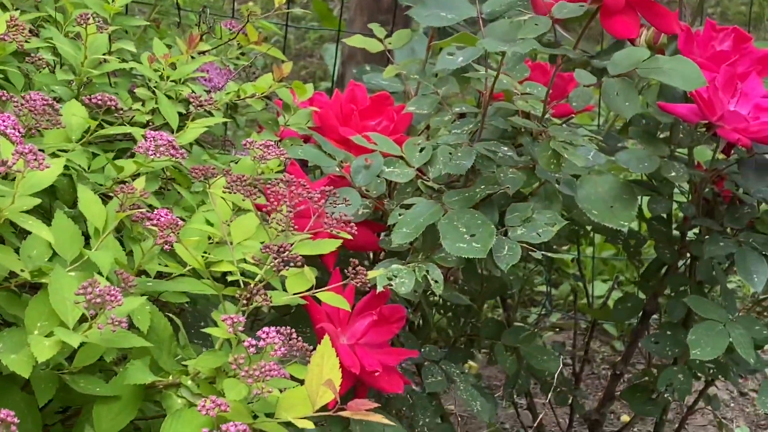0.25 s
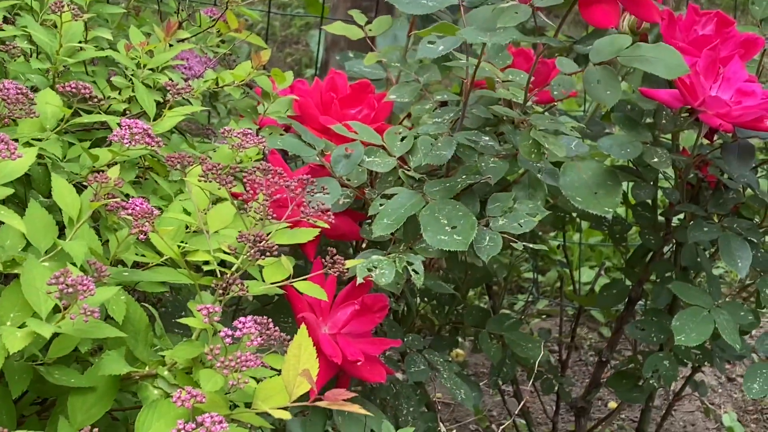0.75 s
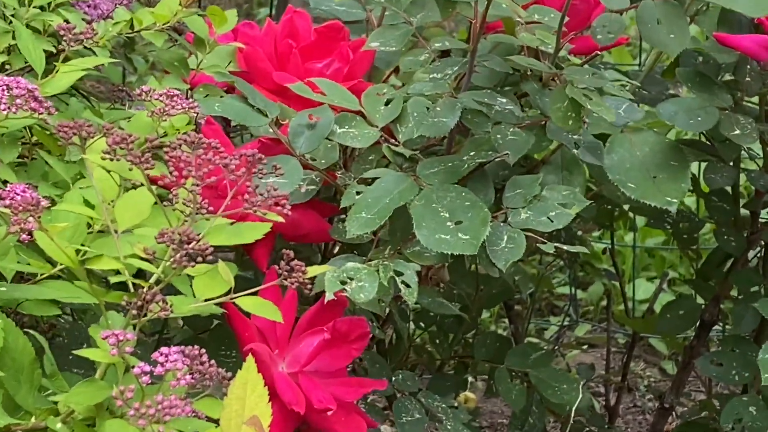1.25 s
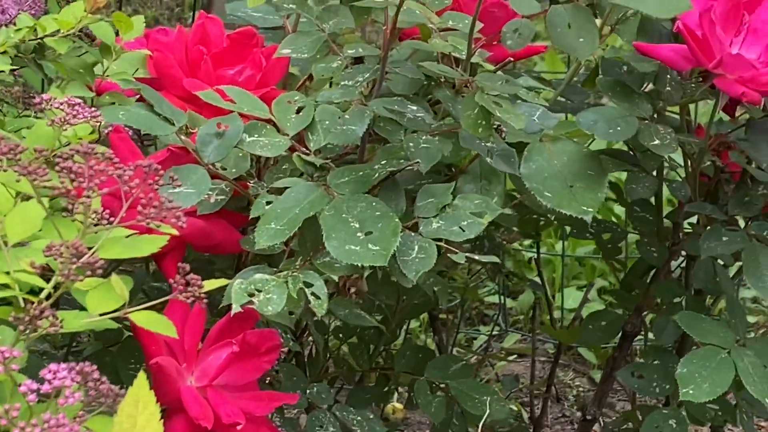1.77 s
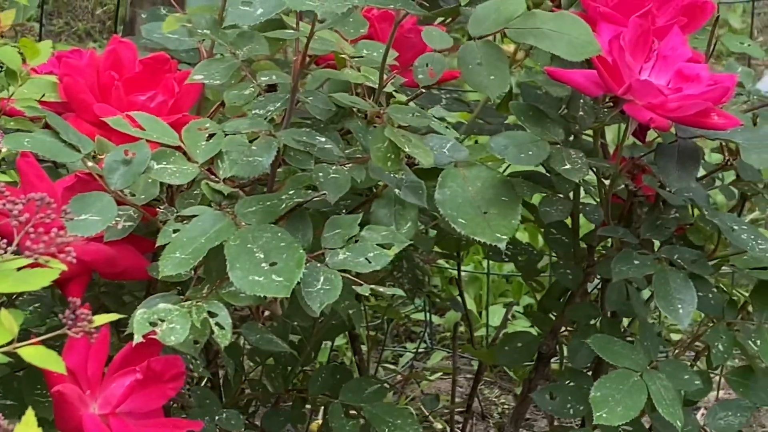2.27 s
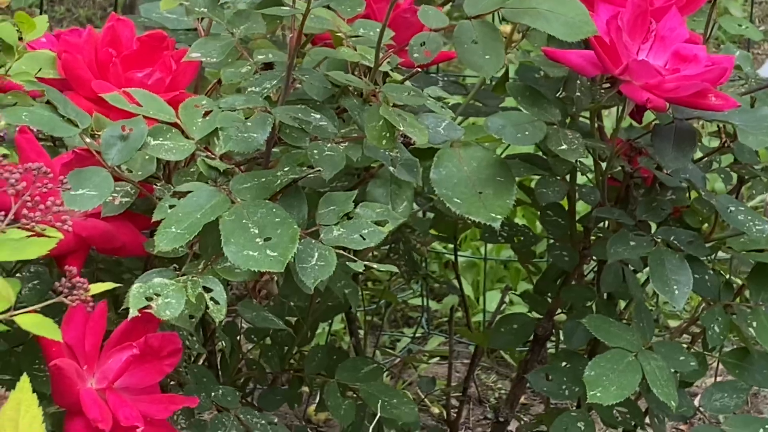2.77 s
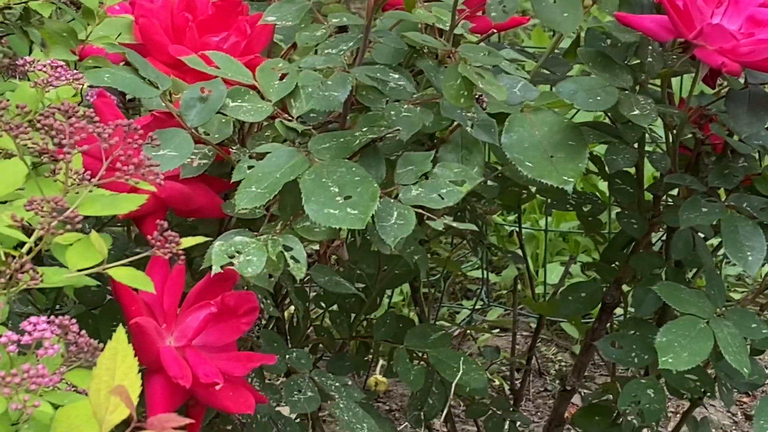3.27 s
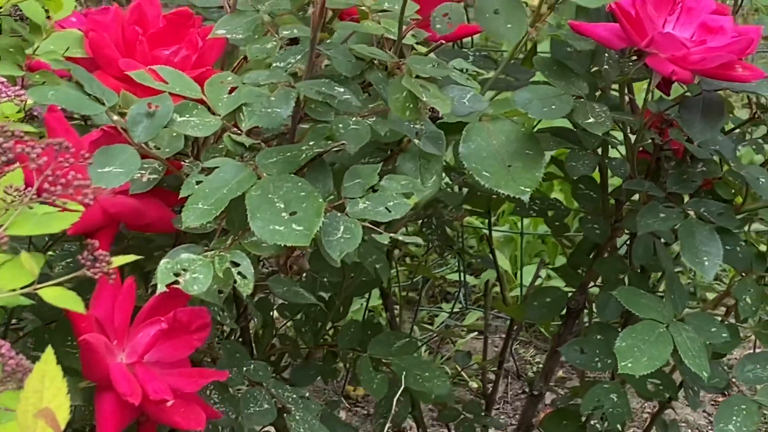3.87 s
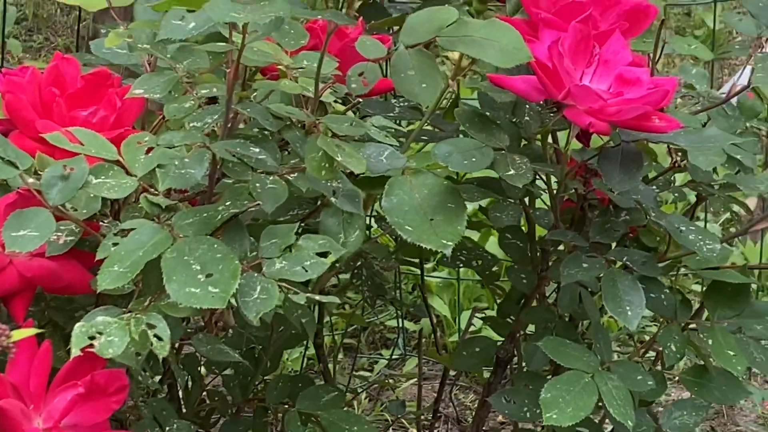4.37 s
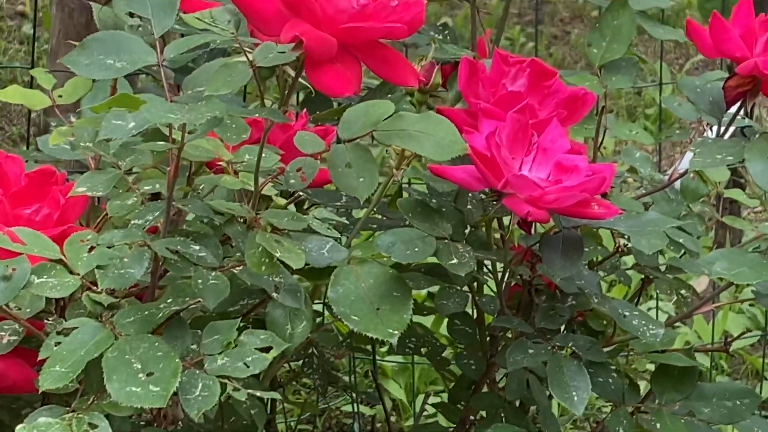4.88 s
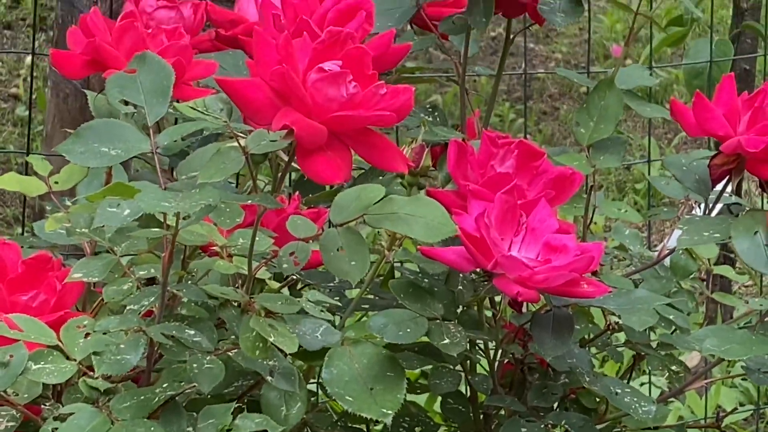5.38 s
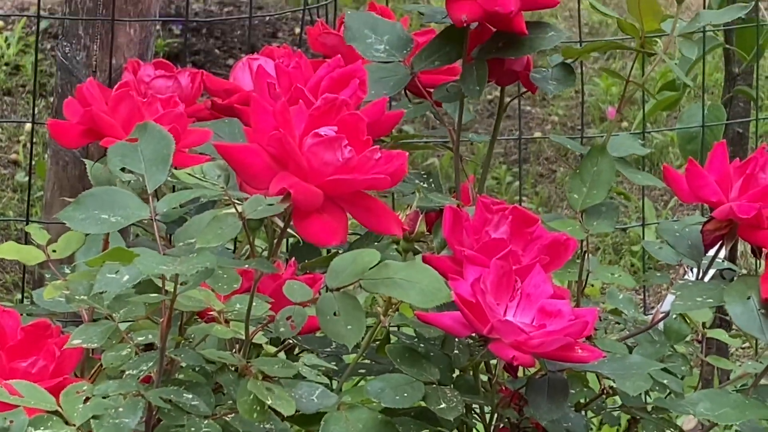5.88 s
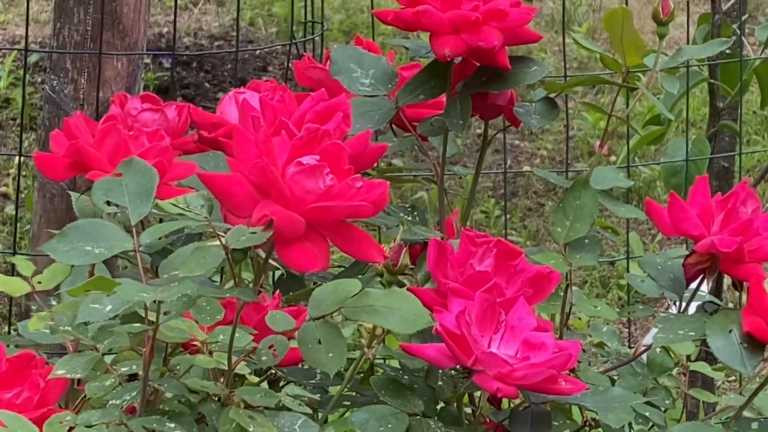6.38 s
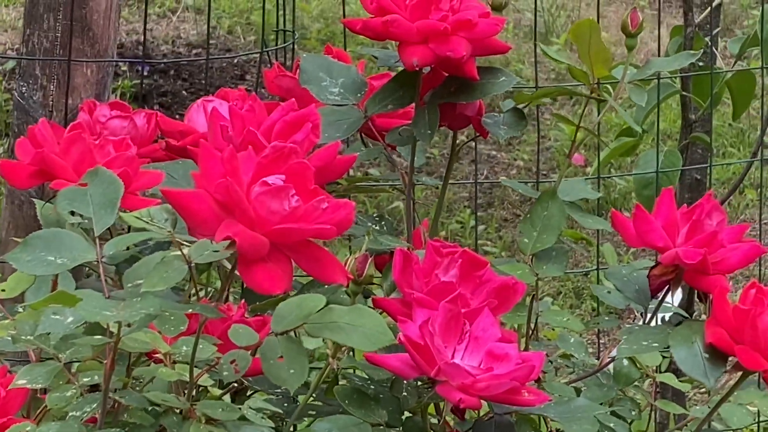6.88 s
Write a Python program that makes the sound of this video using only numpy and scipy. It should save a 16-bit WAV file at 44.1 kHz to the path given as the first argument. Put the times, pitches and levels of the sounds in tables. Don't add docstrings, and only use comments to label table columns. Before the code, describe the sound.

Faint diesel throb and rustling leaves, then gritty starter gears cranking, a booming engine rev, and a low uneven rumble with small metallic ticks.

```python
import sys
import numpy as np
from scipy import signal
from scipy.fft import rfft, irfft, next_fast_len
from scipy.io import wavfile
from scipy.ndimage import uniform_filter1d

SR = 44100
rng = np.random.default_rng(int(sys.argv[2]) if len(sys.argv) > 2 else 0)


def output_pcm(signal):
    pcm = np.clip(np.atleast_2d(signal).T, -1, 1) * 32767
    wavfile.write(sys.argv[1], SR, np.round(pcm).astype(np.int16))


def makeup_ratio(level_db):
    decades = np.asarray(level_db, float) / 20
    return 10 ** decades


N = 314874
TIME, PADDED = np.arange(N) / SR, next_fast_len(N + SR)
BIN_HZ = np.maximum(np.fft.rfftfreq(PADDED, 1 / SR), 1)


def rms_one(x):
    return x / np.sqrt(np.mean(x ** 2) + 1e-20)


def in_time(rows):
    s, *columns = np.transpose(rows)
    gate = np.interp(TIME, [s[0] - 0.03, s[0], s[-1], s[-1] + 0.03], [0, 1, 1, 0])
    return [gate] + [np.interp(TIME, s, c) for c in columns]


def at_hz(points):
    hz, value_db = np.transpose(points)
    octaves_outside = np.log2(np.maximum(hz[0] / BIN_HZ, 1) * np.maximum(BIN_HZ / hz[-1], 1))
    return np.interp(np.log(BIN_HZ), np.log(hz), value_db) - 24 * octaves_outside


def noise(gain):
    return rms_one(irfft(rfft(rng.standard_normal(PADDED)) * gain, PADDED)[:N])


def drift(hz):
    return noise(1 / (1 + (BIN_HZ / hz) ** 2))


def hump(s, length_s):
    return np.exp(-8 * ((TIME - s) / length_s) ** 2)


def age_s(start_s):
    return np.maximum(TIME - start_s, 0)


def attack(age, rise_s):
    return 1 - np.exp(-age / rise_s)


def sine(turns):
    return np.sin(2 * np.pi * turns)


def panel_gain(panels, share):
    bumps = [db / (1 + (2 * (BIN_HZ - hz) / width_hz) ** 2) for hz, width_hz, db in panels]
    return makeup_ratio(share * sum(bumps))


def resonate(x, modes):
    out = 0
    for k, (hz, width_hz, db) in enumerate(modes):
        r = np.exp(-np.pi * width_hz / SR)
        poles = [1, -2 * r * np.cos(2 * np.pi * hz / SR), r * r]
        out = out + (-1) ** k * makeup_ratio(db) * signal.lfilter([1 - r, 0, r - 1], poles, x)
    return out


def evened(x, span_s):
    return x / np.sqrt(uniform_filter1d(x ** 2, int(span_s * SR)) + 1e-12)


# start_s, level_db, throb_db
FAR = [
    (0.0, -45, 4),
    (0.14, -56, 1),
    (0.55, -55.5, 1.5),
    (0.8, -57, -2),
    (1.1, -58.5, 0.5),
    (1.4, -57, 4),
    (1.84, -54.5, -1.5),
]
# pitch_hz, level_db
FAR_LINES = [(52, -12), (78, -3), (102.5, 0), (129, -9), (156, -10), (180, -17), (205, -14), (231, -24)]


def far_diesel():
    throb_s, throb_peak_s = 0.1433, 0.548
    lines = sum(makeup_ratio(db + 2.6 * drift(4)) * np.sin(2 * np.pi * hz * TIME + hz) for hz, db in FAR_LINES)
    rumble = noise(1 / (1 + ((BIN_HZ - 80) / 55) ** 4))
    hum = rms_one(lines) + makeup_ratio(-10.5) * rumble
    _, level_db, throb_db = in_time(FAR)
    throb = np.cos(2 * np.pi * (TIME - throb_peak_s) / throb_s)
    return makeup_ratio(level_db + 10 + throb_db * throb) * hum


# freq_hz, density_db_per_hz
GARDEN = [(159, -11), (250, -10), (500, -18), (900, -21), (2200, -23.5), (2700, -29), (4000, -33.5),
          (6000, -38), (8000, -49), (10000, -53), (14000, -61), (15200, -68)]


def garden_air():
    breeze = makeup_ratio(0.6 * drift(4))
    return makeup_ratio(-58.5) * breeze * noise(makeup_ratio(at_hz(GARDEN)))


# centre_s, level_db, length_s, centre_hz, width_octaves
PUFFS = [(0.505, -50, 0.054, 250, 0.76), (0.54, -47.5, 0.032, 300, 0.8), (0.615, -59, 0.08, 8950, 11),
         (0.69, -44, 0.032, 129, 0.84), (1.16, -41, 0.074, 55, 0.42), (0.212, -72, .04, 5000, .2),
         (.405, -72, .04, 4600, .2), (0.78, -69, 0.055, 4800, .2), (0.793, -57, 0.17, 207, 0.08),
         (3.337, -55, 0.045, 4130, .2), (4.1, -60, 0.056, 3100, 0.53), (7.045, -48, 0.05, 1000, 1.3),
         (1.488, -39, 0.063, 275.4, 0.1), (1.49, -40, 0.055, 1692, 0.025), (1.286, -31, 0.067, 1620, 0.046),
         (3.323, -51, 0.039, 5000, 2.4), (4.378, -63, 0.079, 6750, 0.22), (4.42, -63, 0.061, 7200, 0.17),
         (4.568, -54, 0.037, 2200, 1.6), (5.106, -59, 0.058, 6800, .25), (5.67, -58, 0.045, 7000, 0.58),
         (7.01, -54.5, 0.079, 2310, 3.1)]
# centre_s, level_db, length_s, centre_hz, width_octaves
KNOCKS = [
    (0.608, -62.5, 0.1, 1700, 0.34),
    (0.93, -61.5, 0.45, 203, 0.18),
    (2.8, -53, .1, 372.6, 0.11),
    (4.3, -64, 0.037, 3500, 0.18),
    (7.03, -38.5, 0.036, 300, 0.38),
    (5.5, -71, 0.036, 3888, 0.41),
    (6.53, -58, 0.047, 2700, 0.29),
]
# centre_s, level_db, length_s, centre_hz, width_octaves
CLUNKS = [(2.0, -38, 0.026, 940, 0.12), (1.8, -38, .035, 1400, .2), (2.4, -40, .04, 1700, 0.13),
          (1.278, -30.5, 0.019, 1020, 0.11), (.584, -62, .015, 7500, 4.4), (0.674, -75, .06, 5700, 3.0),
          (7.9, -30, 0.011, 180, 1), (7.022, -46, .03, 1500, 0.67), (7.046, -43, 0.019, 770, 0.26),
          (7.04, -44, 0.071, 454, 0.14), (2.5, -38, 0.042, 900, 1.8), (1.272, -29, 0.032, 3800, .4),
          (1.268, -35, .03, 5500, .15), (2, -38.5, 0.052, 1150, 0.049), (3.36, -52, .16, 930, 1.5),
          (3.355, -36, 0.069, 350, 0.13), (2.9, -35.5, 0.051, 1500, 1.15)]


def puffs():
    out = 0
    for s, db, length_s, hz, octaves in PUFFS + KNOCKS + CLUNKS:
        band = noise(np.exp(-2 * (np.log2(BIN_HZ / hz) / octaves) ** 2))
        shape = hump(s, length_s) + 1e-12
        burst = shape * band
        out = out + makeup_ratio(db) * burst * np.sqrt(np.sum(shape ** 2) / np.sum(burst ** 2))
    return out


# centre_s, length_s, pitch_hz, glide_hz_per_s, level_db
BOOMS = [(.535, 0.084, 78.5, -2, -37.5), (1.171, 0.16, 77, 0, -43), (1.376, 0.22, 54, -20, -41),
         (1.701, 0.13, 80.5, 0, -42), (1.716, 0.15, 56.5, 0, -38), (1.901, 0.16, 71.4, 63, -29),
         (2.324, 0.11, 64, 0, -21.5), (2.455, .11, 61.4, 0, -26), (2.591, 0.19, 63, 0, -26),
         (2.728, .14, 59.5, -2, -22.5), (2.899, 0.21, 67, 40, -24.5), (2.993, 0.082, 86, 0, -31),
         (3.1, 0.2, 74.5, 0, -27), (3.239, .16, 79, -2, -23.5), (3.339, .1, 75.5, -20, -29),
         (3.2, .12, 166.5, -30, -35), (3.23, 0.089, 123, 0, -29)]


def booms():
    out = 0
    for s, length_s, hz, glide, db in BOOMS:
        since = TIME - s
        out = out + makeup_ratio(db + 2 * drift(35)) * hump(s, length_s) * sine((hz + glide / 2 * since) * since)
    return out


# start_s, pitch_hz, level_db
PUMP = [
    (0.56, 348.1, -61),
    (0.582, 351, -74),
    (0.654, 356.9, -63),
    (0.988, 350.2, -67.5),
    (1.212, 344, -68),
    (1.232, 343, -72),
    (1.27, 334, -52),
]


def fuel_pump():
    gate, pitch_hz, level_db = in_time(PUMP)
    return gate * makeup_ratio(level_db + 6.5) * sine(np.cumsum(pitch_hz) / SR)


# start_s, peak_db, ring_hz, ring_db, t60_s
JOLTS = [
    (1.256, -29, 323, -44, 0.62),
    (1.284, -26, 289, -34.5, 0.13),
    (1.599, -22.5, 310, -27.5, 0.26),
    (1.693, -24, 340, -30.5, 0.28),
    (1.774, -19.5, 370, -35, 0.15),
    (1.797, -33, 282, -47, 0.39),
    (1.995, -32, 300, -41, 0.13),
]
# freq_hz, density_db_per_hz
GEARS = [(250, -1.5), (450, -4), (750, -8), (1000, -9), (1700, -2), (2200, -6), (3000, -6.5), (4000, -15)]
# freq_hz, width_hz, gain_db
PANELS = [(528, 20, -10), (700, 7, 5), (1000, 160, 8.5), (1166, 32, 13.5), (1345, 60, 7), (1460, 12, 9),
          (1650, 12, 8), (1680, 29, 11), (1770, 40, 9), (1910, 45, 11), (2430, 9.1, 15.5), (3650, 20, -2),
          (4030, 45, -7), (4450, 30, 15), (4680, 40, 10), (5450, 31, 11), (5700, 51, 5), (5960, 370, 0)]


def gear_grind(grind_db):
    level = makeup_ratio(grind_db)
    for s, peak_db, _, _, t60_s in JOLTS:
        age = age_s(s)
        level = level + makeup_ratio(peak_db - 10.5) * attack(age, 0.0055) * makeup_ratio(-60 * age / t60_s)
    grit = makeup_ratio(0.77 * drift(240))
    return level * grit * noise(makeup_ratio(at_hz(GEARS)) * panel_gain(PANELS, share=0.99))


# centre_s, length_s, mesh_hz, level_db
SINGS = [
    (1.388, 0.08, 236.2, -35.5),
    (1.495, 0.029, 275.8, -47),
    (1.527, 0.042, 246.8, -39),
    (1.711, .03, 362, -38.5),
    (1.793, 0.033, 375, -37.5),
]
MESH = [4, 13.5, 14, 3.5, -7, 6, -15, 11.5]


def gear_song():
    sag_hz_per_s = 40
    swells = np.array([makeup_ratio(db) * hump(s, 2 * length_s) for s, length_s, _, db in SINGS]) + 1e-12
    centre_s, _, mesh_hz, _ = np.transpose(SINGS)[:, swells.argmax(axis=0)]
    pitch_hz = mesh_hz - sag_hz_per_s * np.clip(TIME - centre_s, -0.1, 0.1)
    turns = np.cumsum(pitch_hz * (1 + 0.0087 * drift(41))) / SR
    tone = sum(makeup_ratio(db + 2 * drift(20)) * sine((k + 1) * turns) for k, db in enumerate(MESH))
    return swells.max(axis=0) * rms_one(tone)


# pitch_hz, level_db, t60_s
HOUSING = [(702, -2, 0.11), (971, 7, 0.044), (1160, -20, 0.12), (1298, -9, 0.13), (1570, -13, 0.22),
           (1690, -18, 0.14), (1960, -24, 0.098), (2520, -23, .12)]


def housing_ring():
    strike_spread_db = 2
    ring = 0
    for s, peak_db, ring_hz, ring_db, _ in JOLTS:
        age = age_s(s)
        swing = attack(age, 0.0011) * makeup_ratio(-60 * age / 0.2) * (1 + 0.5 * sine(64 * age))
        ring = ring + makeup_ratio(ring_db - 0.5) * swing * sine(ring_hz * age)
        for hz, db, t60_s in HOUSING:
            luck_db = strike_spread_db * rng.standard_normal()
            strength = makeup_ratio(peak_db + db - 6.5 + luck_db - 60 * age / t60_s)
            ring = ring + attack(age, 0.011) * strength * sine(hz * age)
    return ring


# start_s, grind_db, rasp_centre_hz
STARTER = [(1.243, -65, 4230), (1.26, -35, 4230), (1.33, -41.5, 4380), (1.5, -36.5, 4560),
           (1.545, -38.5, 4600), (1.565, -41.5, 4630), (1.67, -46.5, 5200), (1.74, -45, 5620),
           (1.85, -49.5, 5800), (2.02, -37.5, 5870), (2.07, -56, 5450)]


def starter():
    gate, grind_db, _ = in_time(STARTER)
    return gate * (gear_grind(grind_db) + gear_song() + housing_ring())


# start_s, level_db, t60_s
SCRAPES = [
    (1.245, -45, 0.12),
    (1.258, -25, 0.1),
    (1.28, -34, 0.062),
    (1.598, -43, 0.13),
    (1.693, -41, 0.18),
    (1.77, -39, 0.26),
    (1.885, -46, 1),
    (1.982, -36, 0.15),
]
# freq_hz, density_db_per_hz
RASP_COLOUR = [(2500, -8), (3500, -4.5), (5000, -6.5), (5700, -4.5), (8000, -4.5), (10000, -12),
               (14000, -17), (15600, -13)]


def rasp():
    gate, _, centre_hz = in_time(STARTER)
    running = np.interp(TIME, [1.25, 1.262, 2.01, 2.04], [0, 1, 1, 0])
    level = running * makeup_ratio(-46 + 4 * (TIME - 1.42))
    for s, db, t60_s in SCRAPES:
        age = age_s(s)
        level = level + attack(age, 0.0039) * makeup_ratio(db - 60 * age / t60_s)
    wide = noise(makeup_ratio(at_hz(RASP_COLOUR)) * panel_gain(PANELS, share=0.67))
    carrier = np.sqrt(2) * sine(np.cumsum(centre_hz) / SR)
    narrow = noise(1 / (1 + (BIN_HZ / 450) ** 4)) * carrier
    return gate * level * (wide + makeup_ratio(-7) * narrow)


CYLINDERS = [0.5, -2, 0.5, 1, -6, -0.5, -1.5, -1.5]


def firings(turns, spread_db, jitter, cancelled):
    count = np.arange(int(turns[-1]))
    late, strong = rng.standard_normal((2, len(count)))
    at = np.interp(count + jitter * late, turns, np.arange(N)).astype(int)
    clicks = np.full(N, 1e-18)
    np.add.at(clicks, at, makeup_ratio(np.array(CYLINDERS)[count % 8] + spread_db * strong) - cancelled)
    return clicks


# freq_hz, width_hz, gain_db
PIPE = [(45.7, 25.6, -6), (63.4, 9.1, -4.5), (80, 18, -7.5), (105.5, 33.4, -5), (136.4, 4.7, 1)]


def pipe_thud(turns):
    clicks = firings(turns, spread_db=2, jitter=0.04, cancelled=0.95)
    return 0.85 * evened(resonate(clicks, PIPE), 0.3)


# multiple_of_firing_rate, level_db_re_thud, resonance_hz, width_hz
BELT = [(2.08, 2, 128, 30), (.875, -6, 55, 30), (1.18, -1.5, 74, 22), (.625, -6, 45, 40),
        (1.375, -9, 88, 30), (.75, -4, 78, 14), (1.875, -6, 110, 16), (1.75, 1, 190, 55),
        (.875, -6, 100, 25), (1.5, -4, 165, 26), (1.375, -5, 150, 24), (1.25, -4, 125, 22),
        (3.375, -12, 213, 30), (4.5, -12, 288, 16), (3.875, -15, 245, 30), (3, -12, 190, 40),
        (2, -1, 114, 12), (2.625, -8, 298, 16), (2.75, -4, 305, 14)]


def driven_parts(turns, per_s):
    out = 0
    for multiple, db, hz, width_hz in BELT:
        near = 1 / (1 + (2 * (multiple * per_s - hz) / width_hz) ** 2)
        out = out + near * makeup_ratio(db + 1.5 + 1.7 * drift(9)) * sine(multiple * turns)
    return out


# freq_hz, width_hz, gain_db
MUFFLER = [(154.6, 47.6, 1), (199, 51, 1.5), (300, 30.4, 0.5), (361, 35.4, 0), (394, 76, -5.5),
           (563, 152, -13)]


def muffler_growl(turns):
    clicks = firings(turns, spread_db=1.6, jitter=0.045, cancelled=0.35)
    turbulence = 0.07 * rng.standard_normal(N)
    return evened(resonate(clicks + turbulence, MUFFLER), 0.39)


# freq_hz, density_db_per_hz
BLOCK = [(500, -11), (700, 1), (1200, 1.5), (1500, 4), (1900, 0.5), (2250, -4.5), (3000, -8.5),
         (4000, -14.5), (6000, -21)]
# freq_hz, density_db_per_hz
INTAKE = [(2500, -2), (4000, 1.5), (6000, -4), (7300, 0), (10000, -5.5), (14000, -7), (15500, -6.5)]
# freq_hz, width_hz, gain_db
COVERS = [(540, 24, 7.5), (699, 21, 5.5), (1050, 260, 3), (1235, 58, -4), (1380, 20, 6.5), (1394, 3.9, 7),
          (1505, 12, 7.5), (1788, 31, 10.5), (1900, 24, 4.5), (2455, 15, 11), (2880, 68, 7), (3160, 18, 11),
          (3470, 38, 7), (3880, 24, 11.5), (4230, 33, 9.5)]


def clatter_and_hiss(turns):
    clicks = firings(turns, spread_db=2, jitter=0.045, cancelled=0)
    puff = evened(signal.lfilter([1], [1, -np.exp(-1 / (0.02 * SR))], clicks), 0.48)
    clatter = noise(makeup_ratio(at_hz(BLOCK)) * panel_gain(COVERS, share=0.79))
    hiss = noise(makeup_ratio(at_hz(INTAKE)) * panel_gain(COVERS, share=0.69))
    return rms_one(clatter * (1 + 0.14 * puff)), rms_one(hiss * (1 + 0.14 * puff))


# start_s, load_db_re_idle
ENGINE = [(1.84, -15), (1.91, 15), (2.03, 7.5), (2.14, 14), (2.24, 11.5), (2.44, 14), (2.63, 10.5),
          (2.86, 4.5), (3.09, 0.5), (3.3, 5.5), (3.6, 0), (4.05, -2), (4.41, -2), (4.8, -2.5), (5.2, -2.5),
          (5.94, -3.5), (6.59, -6), (7.14, -2.5)]
# start_s, firings_per_s
SPEED = [(1.84, 46), (1.97, 56), (2.04, 64), (2.15, 81), (2.25, 93), (2.35, 100.5), (2.5, 111), (2.64, 117),
         (2.85, 111.5), (3.0, 103), (3.15, 94), (3.31, 79), (3.46, 67.5), (3.78, 60.5), (4.17, 56.8),
         (4.8, 62.3), (5.5, 64.2), (7.14, 59.2)]
# centre_s, depth_db, length_s
STUMBLES = [(1.885, 4, 0.034), (1.94, 17, 0.026), (2.228, -2, 0.05), (2.556, 6, 0.02), (2.397, 8, 0.18),
            (3.07, 8, 0.052), (3.183, -1, 0.058), (2.68, 14, 0.048), (3.267, -1, 0.034), (3.407, 4.5, 0.08),
            (3.547, 4, 0.068), (3.994, 7, 0.14), (4.36, 21, 0.043), (5.02, 7, 0.011), (5.174, -3, 0.043),
            (5.27, -5, 0.013), (7.02, 9, 0.042)]
# firings_per_s, gain_db
TAILPIPE = [(46, -10), (56, -3.5), (64, 0), (78, 1), (92, -7), (101, 0), (112, -0.5), (120, 3)]


def engine():
    gate, load_db = in_time(ENGINE)
    _, per_s = in_time(SPEED)
    turns = np.cumsum(per_s) / SR
    doublings = np.log2(per_s / 60)
    stumble_db = sum(depth_db * hump(s, 2 * length_s) for s, depth_db, length_s in STUMBLES)

    tone_db = -29 + 0.92 * load_db - 1.3 * doublings
    thud_db = -39.5 + 0.19 * load_db + 5.64 * doublings
    growl_db = -41 + 0.043 * load_db + 12.4 * doublings
    clatter_db = -47.7 + 0.17 * load_db + 8.06 * doublings
    hiss_db = -58.5 + 0.44 * load_db + 4.8 * doublings

    tone_db = tone_db - stumble_db + np.interp(per_s, *np.transpose(TAILPIPE))
    thud_db = thud_db - 0.26 * stumble_db
    growl_db = growl_db + np.interp(TIME, [2.04, 2.31], [-8.5, 0])

    flutter = 1 + 0.23 * sine(turns * 3 / 8) + 0.22 * drift(25)
    tone = flutter * makeup_ratio(tone_db) * sine(turns)
    thud = pipe_thud(turns) + driven_parts(turns, per_s)
    clatter, hiss = clatter_and_hiss(turns)
    takeover = np.interp(TIME, [1.99, 2.04], [0, 1])
    swell = takeover * makeup_ratio(0.45 * drift(20))
    exhaust = tone + makeup_ratio(thud_db) * thud + makeup_ratio(growl_db) * muffler_growl(turns)
    return gate * (exhaust + swell * (makeup_ratio(clatter_db) * clatter + makeup_ratio(hiss_db) * hiss))


# start_s, peak_db, pitch_hz
RATTLES = [(3.4585, -50, 2580), (3.5617, -52, 2400), (3.7852, -49, 2780), (3.867, -63, 2690),
           (4.095, -67, 2980), (4.2185, -47.5, 2800), (4.601, -47, 2930), (4.75, -50, 2830),
           (5.5, -48, 2480), (6.4502, -53, 3220), (6.539, -50.5, 2800)]


def rattles():
    t60_s, partials = 0.063, [(1, 0), (1.13, -5), (1.37, -11)]
    out = 0
    for s, db, hz in RATTLES:
        age = age_s(s)
        for ratio, part_db in partials:
            out = out + makeup_ratio(db + part_db - 60 * age / t60_s) * sine(hz * ratio * age)
    return out


ECHO_MS = [3.1, 5.3, 8.9, 13.7, 19.3, 27.1]
# freq_hz, right_lead_cycles
PORT_TURNS = [(20, 0), (7250, 0), (8480, .5), (8600, .5), (9800, 1), (10400, 1), (11800, 1.5), (12500, 1.5),
              (13450, 2), (14300, 2), (15300, 2.5), (22050, 2.5)]
# freq_hz, side_re_mid_db
DIFFUSE = [(30, -26), (110, -21), (200, -26), (400, -2.5), (700, 0.5), (1300, -0.5), (1900, 0.5),
           (2500, -7), (3300, -16.5), (3700, -39)]
# freq_hz, left_minus_right_db
LEAN = [(30, 4), (200, -4.5), (400, -3), (950, -8), (1400, -4), (1650, 5.5), (2100, 0), (2500, -1),
        (20000, 9.5)]


def scene():
    ambience = far_diesel() + garden_air() + puffs()
    machine = booms() + fuel_pump() + starter() + rasp() + engine() + rattles()
    direct = rfft(ambience + machine, PADDED)
    scattered = direct
    for ms in ECHO_MS:
        delay = np.exp(-2j * np.pi * BIN_HZ * round(ms * SR / 1000) / SR)
        scattered = scattered * (delay - 0.6) / (1 - 0.6 * delay)
    wide = BIN_HZ < 3700
    slip = np.pi * np.interp(BIN_HZ, *np.transpose(PORT_TURNS))
    diffuse = wide * (0.8 * scattered - 0.5j * direct) * makeup_ratio(at_hz(DIFFUSE) - 3.5)
    side = diffuse - 1j * np.sin(slip) * (0.8 * direct + 0.4 * scattered)
    lean = makeup_ratio(wide * at_hz(LEAN) / 2)
    mid = direct * np.cos(slip)
    ports = irfft(np.array([mid * lean + side, mid / lean - side]), PADDED)[:, :N]
    return np.minimum(TIME / 0.012, 1) * ports


def low_pass(x):
    return signal.sosfilt(signal.butter(12, 15800, fs=SR, output="sos"), x)


def record(dry):
    low_cut = signal.butter(4, 34, "high", fs=SR, output="sos")
    mix = signal.sosfilt(low_cut, dry)
    return low_pass(mix)


dry = scene()
out = record(dry)
output_pcm(out)
```